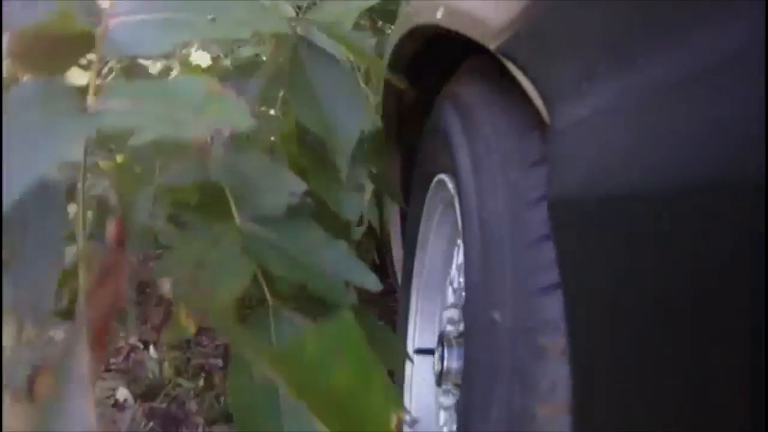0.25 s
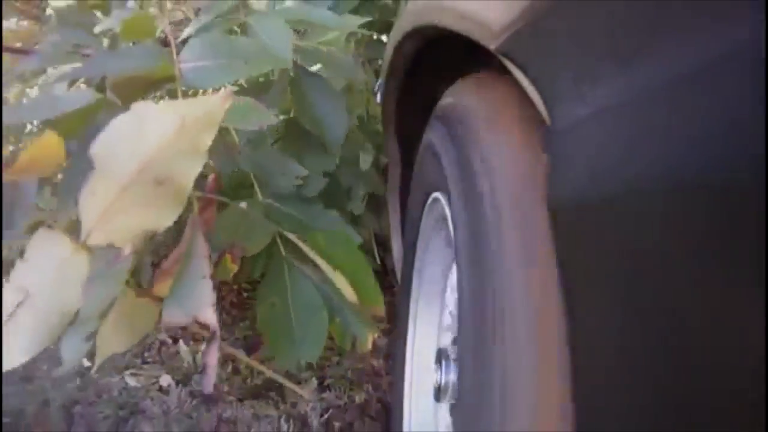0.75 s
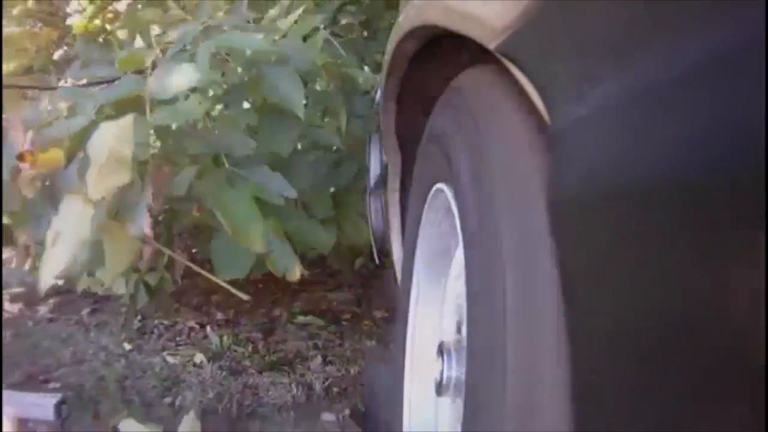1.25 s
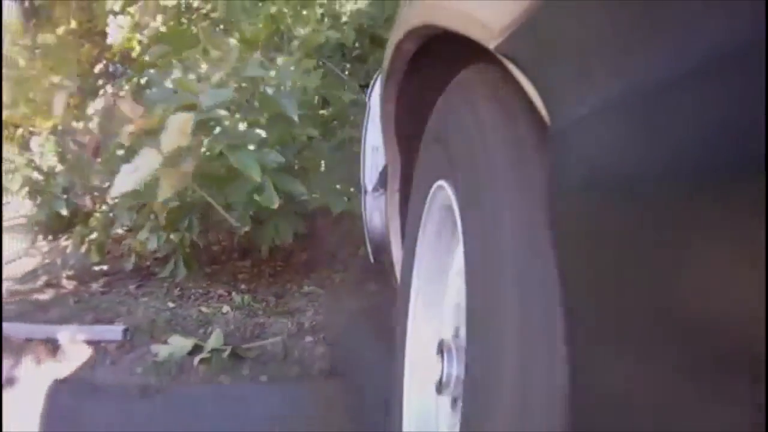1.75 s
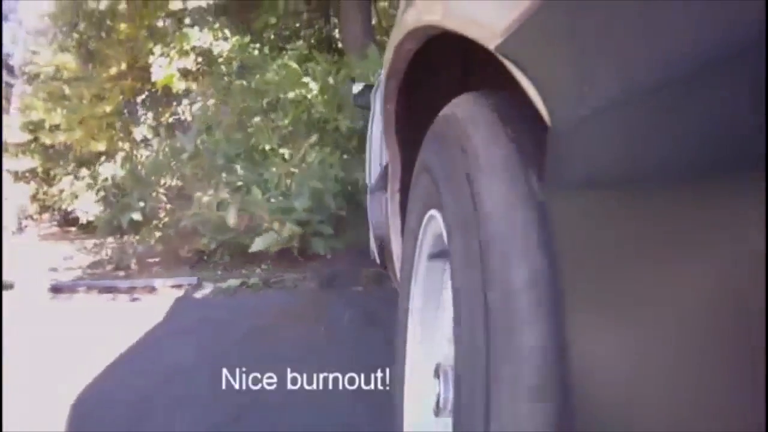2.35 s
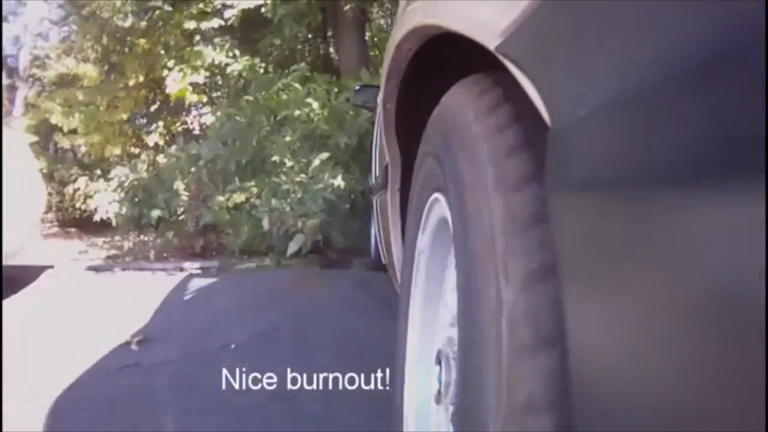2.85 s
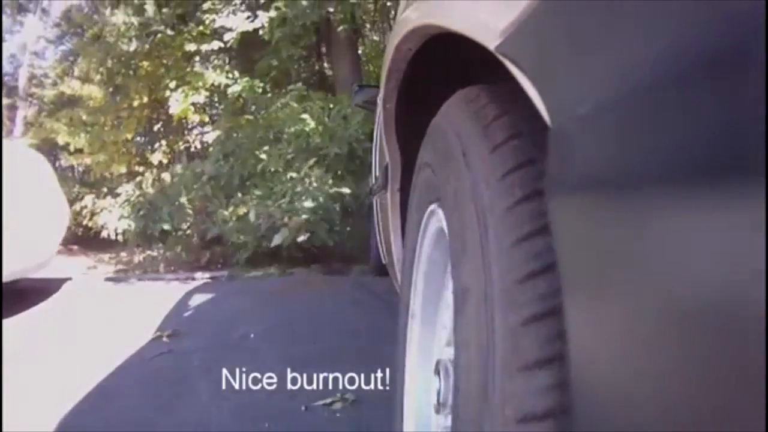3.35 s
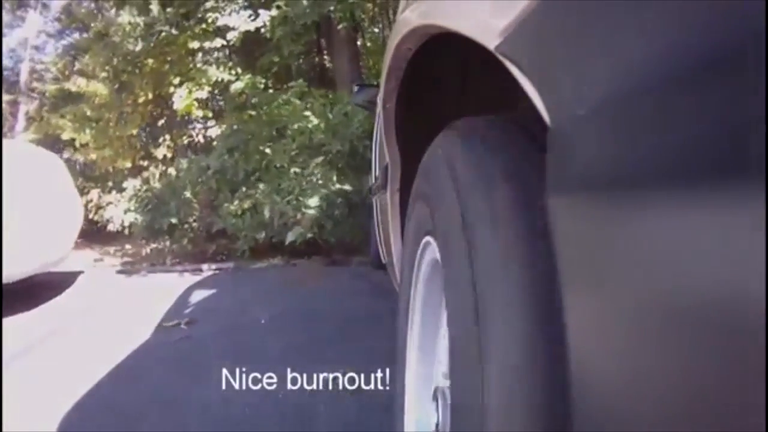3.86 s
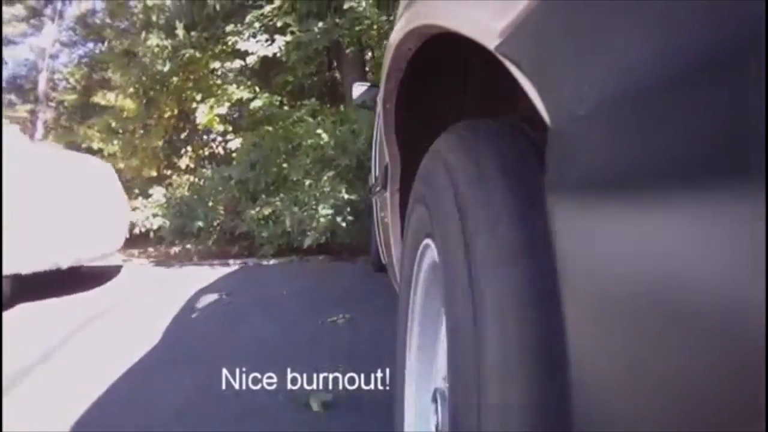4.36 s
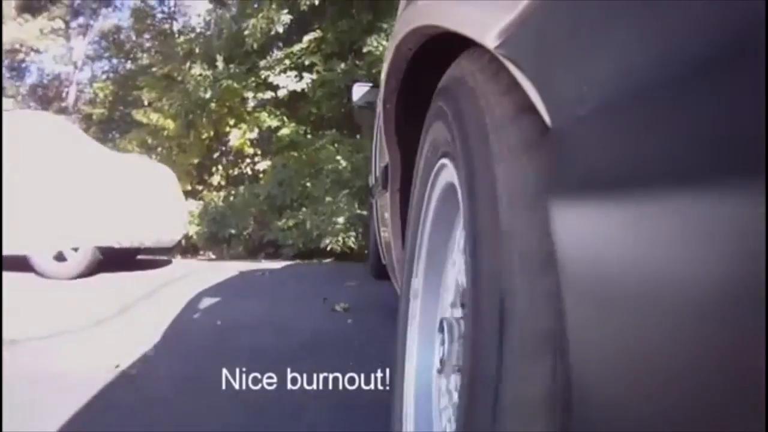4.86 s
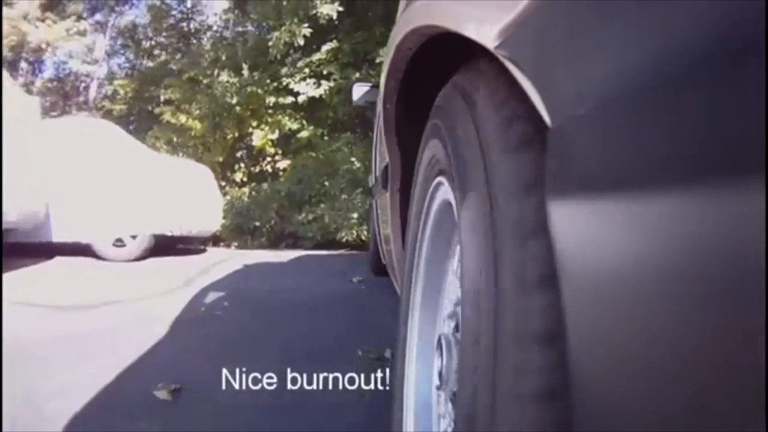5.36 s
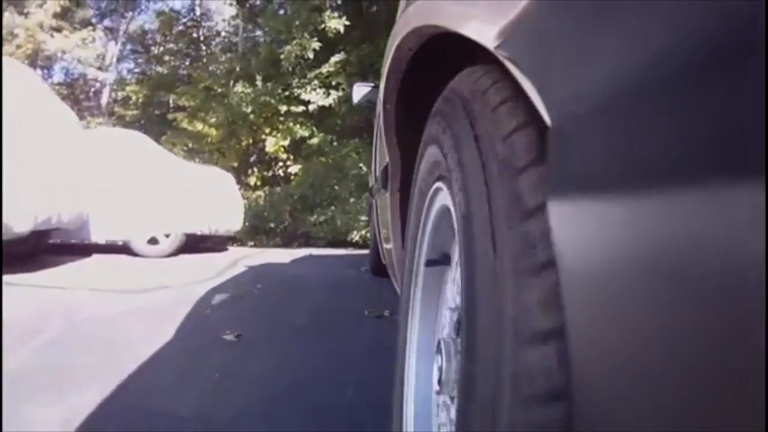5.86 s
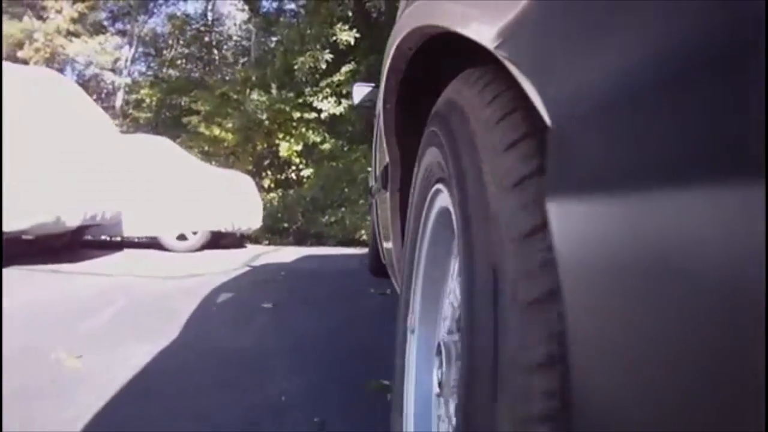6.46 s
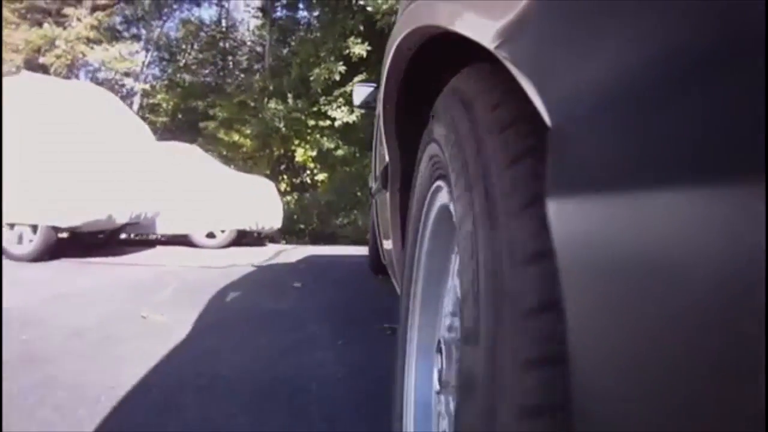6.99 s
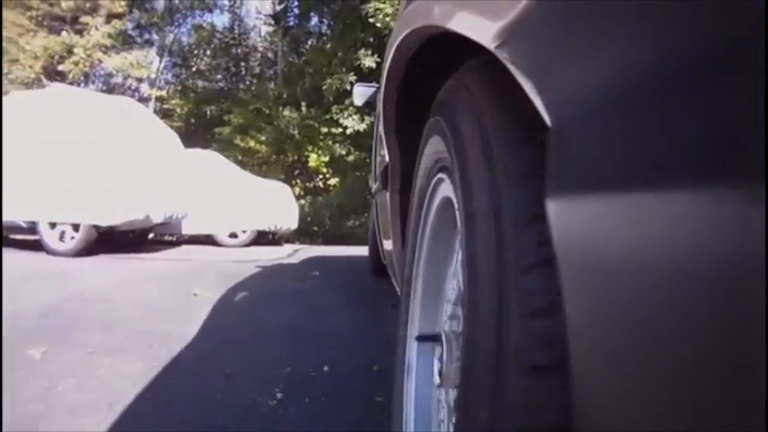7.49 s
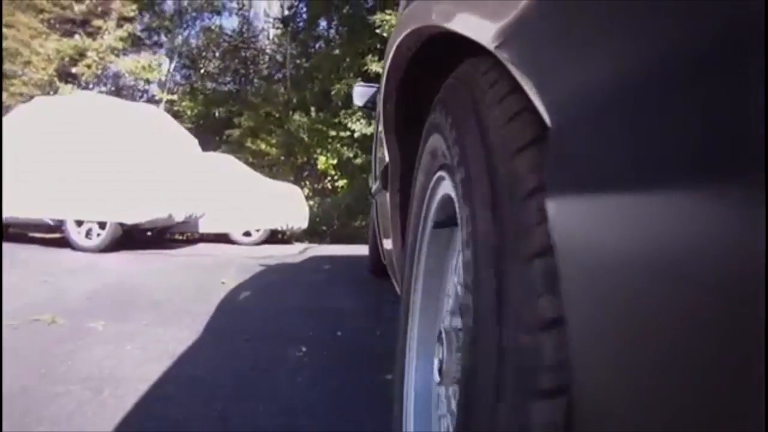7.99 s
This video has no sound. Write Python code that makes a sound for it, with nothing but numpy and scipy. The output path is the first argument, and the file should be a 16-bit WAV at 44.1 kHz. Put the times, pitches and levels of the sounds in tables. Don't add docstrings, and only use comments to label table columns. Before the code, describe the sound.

Two loud tyre screeches heard close to the wheel, the first long and overloaded, the second juddering, between low hum, road rumble and grit ticks.

```python
import sys
import numpy as np
from scipy import signal
from scipy.io import wavfile
from scipy.ndimage import uniform_filter1d

SR = 44100
rng = np.random.default_rng(int(sys.argv[2]) if len(sys.argv) > 2 else 0)


def level_to_linear(level):
    exponent = np.asarray(level, float) / 20
    return 10 ** exponent


def wav_out(sig):
    wavfile.write(sys.argv[1], SR, np.round(np.clip(np.atleast_2d(sig).T, -1, 1) * 32767).astype(np.int16))


N = 362943


def rms_one(x):
    return x / np.sqrt(np.mean(x ** 2) + 1e-20)


def in_time(rows):
    s, *columns = np.transpose(rows)
    return [np.interp(np.arange(N) / SR, s, c) for c in columns]


def at_hz(points, hz):
    points_hz, points_db = np.transpose(points)
    return np.interp(np.log(hz), np.log(points_hz), points_db)


def span_of(rows):
    return slice(round(rows[0][0] * SR), round(rows[-1][0] * SR))


def drift(rate_hz, size=N):
    r = np.exp(-40 * np.pi * rate_hz / SR)
    slow = signal.lfilter([1], [1, -2 * r, r * r], rng.standard_normal(size // 20 + 2002))[2000:]
    return np.interp(np.arange(size) / 20, np.arange(len(slow)), rms_one(slow))


def resonance(x, hz, width_hz):
    r = np.exp(-np.pi * width_hz / SR)
    gain = (1 - r * r) / 2
    return signal.lfilter([gain, 0, -gain], [1, -2 * r * np.cos(2 * np.pi * hz / SR), r * r], x)


def band_noise(white, low_hz, high_hz, order):
    return signal.sosfilt(signal.butter(order, [low_hz, high_hz], "band", fs=SR, output="sos"), white)


def bands(white, low_hz, count):
    for k in range(count):
        edges_hz = low_hz * 2 ** (np.array([k, k + 1]) / 4)
        yield np.sqrt(edges_hz.prod()), band_noise(white[k % 2], *edges_hz, order=3)


def wind():
    # start_s, level_db
    gust = [(0, -93), (8.02, -83.5), (8.1, -70), (8.16, -54), (8.23, -51.5)]
    white = rng.standard_normal(N)
    low = rms_one(band_noise(white, 20.5, 70, order=2))
    skirt = rms_one(band_noise(white, 150, 1200, order=2))
    return level_to_linear(in_time(gust)[0] + 2.0 * drift(15)) * (low + skirt)


def pump():
    # multiple, level_db
    overtones = [(1, -24), (2, -20), (3, -3.5), (4, -1), (5, -3), (6, -6.5), (7, 1), (8, -1), (9, 2),
                 (10, 5.5), (11, 3), (12, -21.5), (13, 0), (14, 4), (15, -5), (16, 4), (17, -11), (18, -14),
                 (19, -30), (20, -25), (21, -5), (22, -10), (23, -22.5)]
    # start_s, level_db
    pump_level = [(0, -56.5), (3, -56), (4.5, -51), (8.23, -53.5)]
    stroke_hz = 35.83 * (1 + 0.0014 * drift(1.36))
    phase = 2 * np.pi * np.cumsum(stroke_hz) / SR
    tone = 0
    for k, db in overtones:
        path_rad = rng.uniform(0, 2 * np.pi) + 0.83 * drift(1.2)
        tone = tone + level_to_linear(db) * np.sin(k * phase + path_rad)
    return level_to_linear(in_time(pump_level)[0]) * rms_one(tone)


def whine():
    # start_s, length_s, from_hz, to_hz, peak_db
    chirps = [
        (0.863, 0.097, 5500, 6350, -36.5),
        (0.92, .13, 6230, 5400, -33.5),
        (1.132, 0.071, 4620, 4450, -29),
        (1.14, 0.045, 6050, 5900, -33),
        (1.338, 0.11, 753, 696, -30.5),
        (4.16, 0.26, 328.3, 318, -37),
        (8.101, .2, 1040, 1075, -56.5),
        (8.1, 0.22, 700, 730, -55),
        (7.155, 0.081, 1300, 1350, -49.5),
    ]
    out = np.zeros(N + SR)
    flutter = level_to_linear(4 * drift(60, size=N + SR))
    wander_rad = 2.0 * drift(80, size=N + SR)
    for start_s, length_s, from_hz, to_hz, peak_db in chirps:
        span = slice(round(start_s * SR), round((start_s + length_s) * SR))
        along = np.linspace(0, 1, span.stop - span.start)
        hz = from_hz + (to_hz - from_hz) * along
        phase = 2 * np.pi * np.cumsum(hz) / SR + wander_rad[span] * hz / 6000
        out[span] += level_to_linear(peak_db) * np.sin(np.pi * along) * flutter[span] * np.sin(phase)
    return out[:N]


def knocks(events, crack):
    out, t = np.zeros(N), np.arange(6000) / SR
    noise = rng.standard_normal((len(events), len(t)))
    for (start_s, peak_db, ring_hz, t60_s), burst in zip(events, noise):
        broad = rms_one(resonance(burst, 3500, 4000))
        ring = rms_one(resonance(resonance(burst, ring_hz, .12 * ring_hz), ring_hz, .3 * ring_hz))
        decay = level_to_linear(peak_db - 0.5 - 60 * t / max(t60_s, .005))
        hit = decay * np.minimum(t / 0.0028, 1) * (crack * broad + ring)
        at = round(start_s * SR)
        out[at:at + len(t)] += hit[:N - at]
    return out


def grit_ticks():
    # start_s, peak_db, ring_hz, t60_s
    ticks = [(0.2154, -45, 4250, 0.036), (0.2454, -39, 1450, 0.025), (.2458, -39, 2400, .025),
             (.272, -42, 2200, 0.035), (.262, -42, 6900, 0.061), (0.2648, -28, 3980, 0.033),
             (0.364, -48, 1920, 0.04), (0.824, -16, 3700, 0.04), (2.31, -36, 2450, .02),
             (2.4932, -18.5, 3900, 0.029), (2.4945, -20, 2480, 0.047), (2.497, -27, 1630, 0.048),
             (2.542, -24.5, 2280, 0.037), (2.5795, -28, 2850, 0.032), (2.968, -35, 4060, 0.14),
             (3.6461, -39, 4060, 0.057), (3.7765, -43, 2220, 0.04), (6.628, -44, 7000, 0.088),
             (6.64, -38, 2900, .025), (6.7, -31, 2400, 0.033), (6.76, -38, 2200, .03),
             (7.4, -48, 2300, 0.046), (8.1783, -40, 3820, 0.023)]
    return knocks(ticks, crack=0.32)


def thumps():
    # start_s, peak_db, ring_hz, t60_s
    blows = [(.755, -31, 327, 0.066), (.885, -32, 250, .06), (1.07, -18.5, 414, 0.066),
             (1.115, -23, 304, 0.068), (1.24, -24, 520, .05), (2.496, -28, 536, 0.087),
             (2.529, -23, 480, 0.073), (2.55, -32.5, 325, 0.08), (2.589, -39, 377, 0.08),
             (2.974, -42, 373, 0.08), (4.619, -32, 450, 0.13)]
    return knocks(blows, crack=.02)


def rumble(level_db, deep_db):
    # hz, density_db per Hz
    shell_spectrum = [(20, -24.5), (45, -27), (70, -11), (136, -5.5), (280, -5.5), (400, -1), (640, -4.5),
                      (780, -12.5), (1000, -6.5)]
    white, together, out = rng.standard_normal((2, N)), drift(3.5), 0
    for hz, band in bands(white, 21, count=22):
        drive_db = level_db if hz > 65 else deep_db + 22.0
        lumps_db = 1.9 * together + 2.0 * drift(8.1)
        out = out + band * level_to_linear(at_hz(shell_spectrum, hz) + drive_db + 15.5 + lumps_db)
    return out


def road():
    # start_s, level_db
    roll = [(0, -58.5), (.2, -56), (.31, -58.5), (.4, -49.5), (.52, -55), (2.31, -41.5), (2.45, -46),
            (2.85, -49), (2.99, -47), (3.32, -58), (3.76, -58), (4.6, -44), (5.5, -44.5), (6.39, -50),
            (6.8, -46.5), (7.4, -49), (7.7, -52.5), (8.23, -54.5)]
    # start_s, level_db
    slides = [
        [(.5, -61), (.82, -26.5), (1.06, -27.5), (1.3, -18), (1.5, -14), (2.0, -13), (2.2, -19), (2.272, -25),
         (2.3, -36), (2.4, -41.5)],
        [(3.79, -62), (3.83, -26.5), (3.97, -24), (4.2, -18), (4.49, -19), (4.56, -23), (4.585, -47)],
    ]
    # start_s, end_s, roar_db, heave_db, top_db
    shifts = [
        (0.75, 1.3, 7.5, -4.0, 2),
        (1.405, 2.073, -2, 22.0, 6.5),
        (2.238, 2.48, 4.5, 10.0, 1),
        (2.489, 2.623, 18, 38, -2),
        (2.63, 2.773, 6, 15.0, -0.5),
        (3.8, 3.947, -1, 3.0, .5),
        (4.546, 5.32, 2, 15, -0.5),
        (5.6, 6.05, 2.5, -3, .5),
        (6.7, 7.4, 2, 4.0, -0.5),
    ]
    edge_s = 0.074
    power = level_to_linear(2 * in_time(roll)[0])
    for rows in slides:
        span = span_of(rows)
        power[span] += level_to_linear(2 * in_time(rows)[0][span])
    hiss_db, t = 10 * np.log10(power), np.arange(N) / SR
    shift_db = np.zeros((3, N))
    for start_s, end_s, *dbs in shifts:
        inside = np.clip(np.minimum(t - start_s, end_s - t) / edge_s + .5, 0, 1)
        shift_db += np.outer(dbs, inside)
    swing_db = hiss_db + 55
    top_db = -6.0 - 0.31 * swing_db + shift_db[2]
    roar_db = -54.0 + 0.46 * swing_db + shift_db[0]
    heave_db = -88.5 + 0.38 * swing_db + shift_db[1]
    return hiss_db, top_db, roar_db, heave_db


def scrub(hiss_db):
    boom = rms_one(resonance(rng.standard_normal(N), 612, 100))
    return level_to_linear(np.minimum(hiss_db, -20) * 1.47 - 10.0) * boom


def panel_song(white):
    panel_hz = [1172, 1312, 2055, 2560, 3355, 3750, 4500, 4710, 5320, 6000, 6400, 9035, 9865]
    # width_hz, level_db
    panels = [(30, -15), (24.73, -11.5), (109, -4), (50, -12), (91, -6.5), (236, 0), (253, -19), (110, -4),
              (150, -11), (120, -12), (120, -19), (170, -15), (45, -24)]
    # start_s, level_db
    singing = [(0, -2), (2.4, 1), (3.8, -6.5), (4.6, 2.5), (5.5, -4), (8.23, 2.5)]
    singing_db, = in_time(singing)
    out = 0
    for hz, (width_hz, db) in zip(panel_hz, panels):
        width_hz = max(width_hz, hz / 70)
        song = rms_one(resonance(resonance(white, hz, width_hz), hz, 2 * width_hz))
        out = out + level_to_linear(db - 17.0 + singing_db + 1.46 * drift(2.4)) * song
    return out


def tread(hiss_db, top_db):
    # hz, density_db per Hz
    rolling_spectrum = [(850, -9.5), (1100, -12), (1500, -11), (2050, -3.5), (3000, -5.5), (3800, -8.5),
                        (4400, -1.5), (5200, -19.5), (7000, -21), (9500, -22), (10900, -22), (12300, -33),
                        (15500, -49)]
    # hz, density_db per Hz
    spinning_spectrum = [(850, -18), (1100, -11), (1500, -9), (1900, -8), (2400, 2.5), (3000, -5.5),
                         (3700, -0.5), (4400, -3), (5200, -11.5), (6300, -14), (9700, -22.5),
                         (12000, -26.5), (15500, -48.5)]
    hiss_db = np.maximum(hiss_db, -61)
    slip = np.clip((hiss_db + 44.5) / 6.0, 0, 1)
    grain = level_to_linear(6.5 * np.minimum(rng.exponential(1, N), 5))
    grit = grain * (rng.random(N) < 1500.0 / SR) * rng.choice([-1, 1], N)
    white = rng.standard_normal((3, N)) + 0.47 * rms_one(grit)
    rolling, spinning = 0, [0, 0]
    together_db = 0.6 * drift(9) + .8 * drift(35)
    for hz, band in bands(white, 840, count=17):
        top = int(hz > 5000)
        band = band * level_to_linear(together_db + 1.2 * drift(12) + top * (top_db + 10.5))
        rolling = rolling + level_to_linear(at_hz(rolling_spectrum, hz)) * band
        spinning[top] = spinning[top] + level_to_linear(at_hz(spinning_spectrum, hz) - 3.0) * band
    arch = signal.cheby1(6, 1, 4400, fs=SR, output="sos")
    spinning = signal.sosfilt(arch, spinning[0]) + spinning[1]
    rolling = rolling + panel_song(white[2])
    return level_to_linear(hiss_db + 14.5) * (np.sqrt(1 - slip) * rolling + np.sqrt(slip) * spinning)


def shudder():
    grips = [
        (2.242, -13.5, 0.015),
        (3.87, -17, 0.028),
        (3.939, -12.5, 0.024),
        (4.008, -4, 0.026),
        (4.073, -2, 0.024),
        (4.241, -2.5, 0.017),
        (4.314, -5, 0.017),
        (4.386, -3, 0.035),
        (4.457, -5, 0.035),
        (4.529, -10, 0.034),
    ]
    t = np.arange(N) / SR
    return level_to_linear(sum(db * np.exp(-.5 * ((t - s) / (width_s / 2)) ** 2) for s, db, width_s in grips))


def ribs(hz, level_db, scatter_rad, strands):
    size = len(hz)
    phase = 2 * np.pi * np.cumsum(hz) / SR
    note = 0
    for ratio, db in strands:
        wander_rad = scatter_rad * (drift(25, size=size) + .42 * drift(220, size=size))
        note = note + level_to_linear(db + 4.7 * drift(11.8, size=size)) * np.sin(ratio * phase + wander_rad)
    note = note / np.sqrt(uniform_filter1d(note ** 2, size=3000))
    return level_to_linear(level_db + 2.0 * drift(50, size=size)) * note * signal.windows.tukey(size, .03)


def squeal():
    # start_s, pitch_hz, level_db, upper_db
    squeals = [
        [(1.265, 1420, -24, -37), (1.31, 1365, -23, -18), (1.385, 1400, -25.5, -17), (1.42, 1390, -30, -14)],
        [(1.404, 1050, -7, -19), (1.548, 1217, -10, -4), (1.608, 1072, -8.5, -13), (1.68, 1245, -9, -6.5),
         (1.76, 1126, -12.5, -7.5), (1.84, 1145, -10.5, -4.5), (1.925, 1281, -13.5, -5.5),
         (2.025, 1069, -13.5, -8.5), (2.298, 1143, -24.5, -17.5)],
        [(3.808, 1123, -45, -35), (3.835, 1130, -23, -24), (3.965, 1145, -12.5, -15), (4.1, 1158, -15, -14),
         (4.155, 1108, -8, -18), (4.24, 1045, -17, -17), (4.42, 1116, -8.5, -14.5), (4.5, 1114, -10.5, -14.5),
         (4.582, 1163, -23, -23)],
    ]
    # scatter_rad, upper_follow (rising pitch, 0-1), third_db (under second)
    kinds = [(1.63, 0.04, -11.5), (0.94, .5, -15.5), (0.21, .7, -8)]
    # pitch_ratio, level_db
    upper_strands = [(1.0, 2), (1.01, 0), (.9, -10), (1.075, -5), (.95, -8.5)]
    first_strands = [(1, -5), (1, -1.0), (1, 2.5), (1.0, 18.5)]
    catch_shares, catch_s = [0, .25, .03], .013
    rest_hz, second_hz, third_hz = 1140, 2300, 3300
    sag_follows = .95
    lock_hz, lock_width_hz, lock_peak_db = 1075, 56, 7.0
    let_go_db, let_go_s = -26, 0.0098
    out = np.zeros(N)
    for rows, (scatter_rad, follows, third_db), catch in zip(squeals, kinds, catch_shares):
        span = span_of(rows)
        hz, tone_db, upper_db = [c[span] for c in in_time(rows)]
        bend = 1 + np.where(hz > rest_hz, follows, sag_follows) * (hz / rest_hz - 1)
        lock_db = lock_peak_db * np.exp(-((hz - lock_hz) / lock_width_hz) ** 2)
        t = np.arange(len(hz)) / SR
        hz = hz * (1 + catch * np.exp(-t / catch_s))
        fade_db = let_go_db * np.exp(-t[::-1] / let_go_s)
        tone_db, upper_db = tone_db + fade_db, upper_db + fade_db
        out[span] += ribs(hz, tone_db, scatter_rad, first_strands)
        out[span] += ribs(second_hz * bend, upper_db, 0.81 + .7 * scatter_rad, upper_strands)
        third_level_db = upper_db + third_db + lock_db
        out[span] += ribs(third_hz * np.minimum(bend, 1), third_level_db, 1.6, upper_strands[:2])
    return out


def scene():
    hiss_db, top_db, roar_db, heave_db = road()
    body = rumble(roar_db, heave_db) + pump() + whine() + grit_ticks() + thumps()
    bite = shudder()
    tyre = bite * tread(hiss_db, top_db) + scrub(hiss_db)
    tyre = tyre + bite ** 1.94 * squeal()
    return (wind() + body + tyre)[None]


def low_pass(x):
    return signal.sosfilt(signal.butter(12, 15670, fs=SR, output="sos"), x)


def record(dry):
    # hz, width_hz, depth (0-1)
    housing_dips = [(894, 167, 0.77), (2820, 148, 0.51), (4785, 1270, 0.56), (5890, 210, 0.74),
                    (11400, 1500, 0.43)]
    x = dry
    for hz, width_hz, depth in housing_dips:
        x = x - np.clip(depth, 0, 1) * resonance(x, hz, width_hz)
    x = signal.sosfilt(signal.ellip(12, .2, 50, 15000, fs=SR, output="sos"), x)
    ceiling = .99 + .015 * np.sign(x)
    x = x / (1 + np.abs(x / ceiling) ** 24) ** (1 / 24)
    return low_pass(x)


dry = scene()
out = record(dry)
wav_out(out)
```